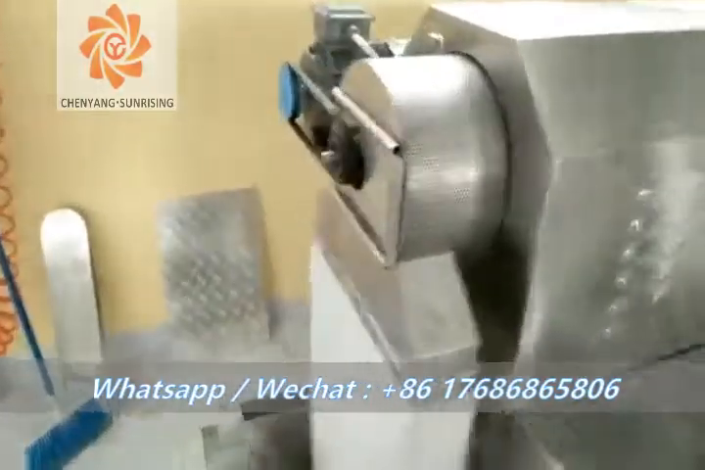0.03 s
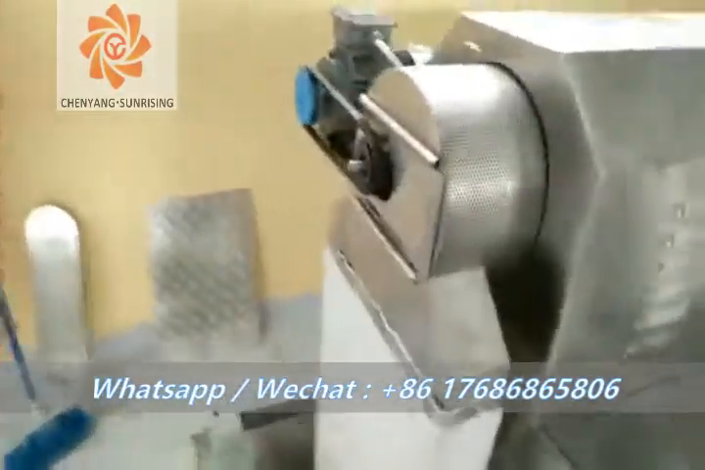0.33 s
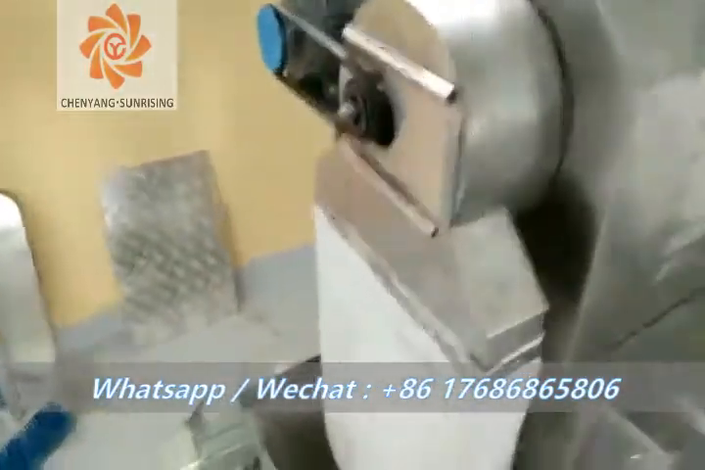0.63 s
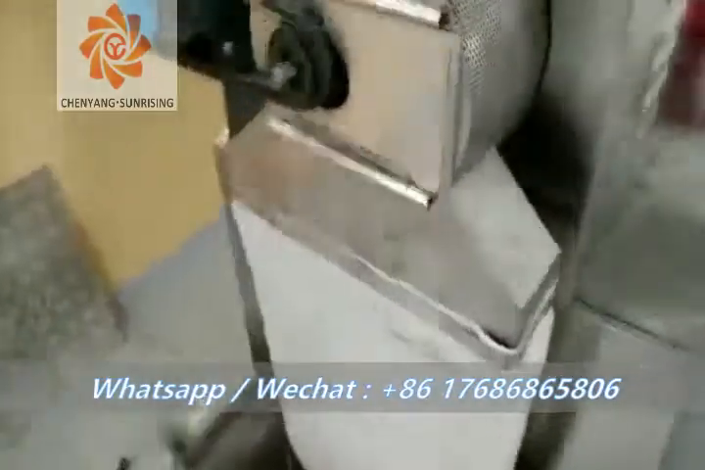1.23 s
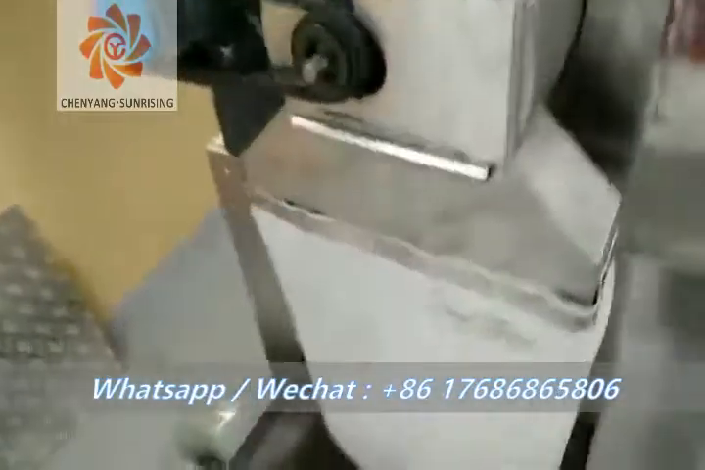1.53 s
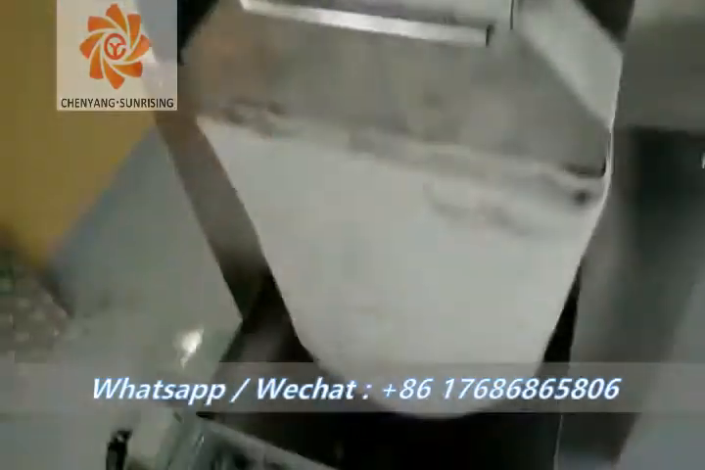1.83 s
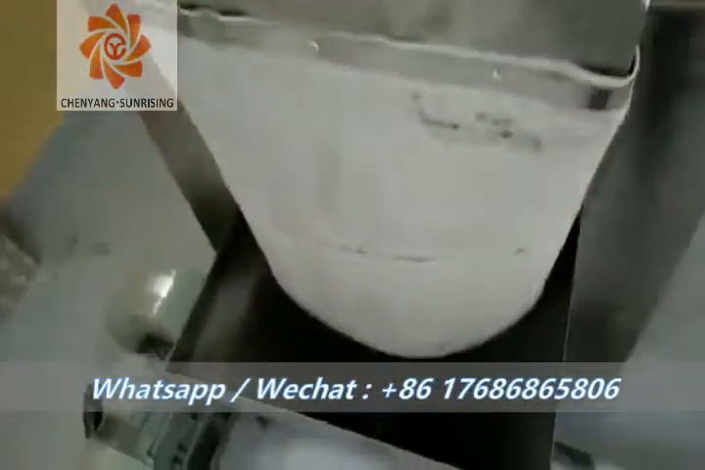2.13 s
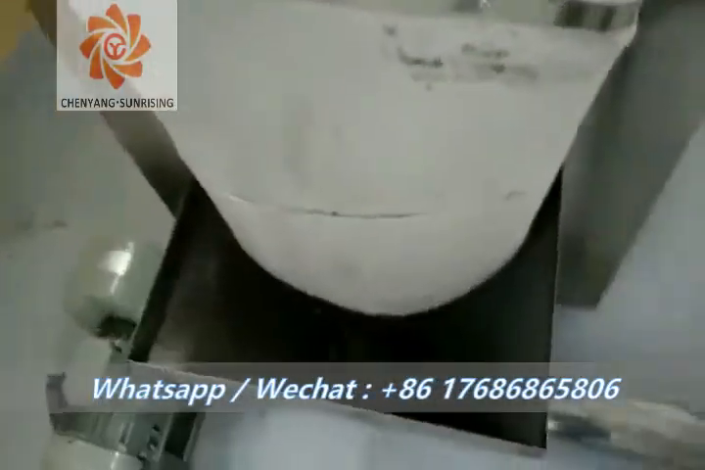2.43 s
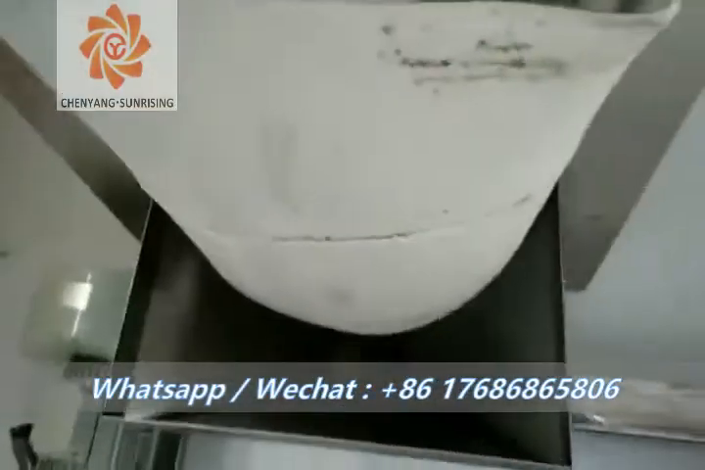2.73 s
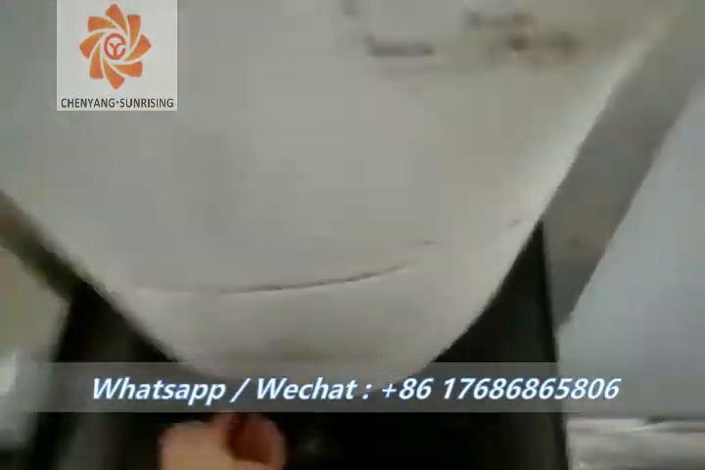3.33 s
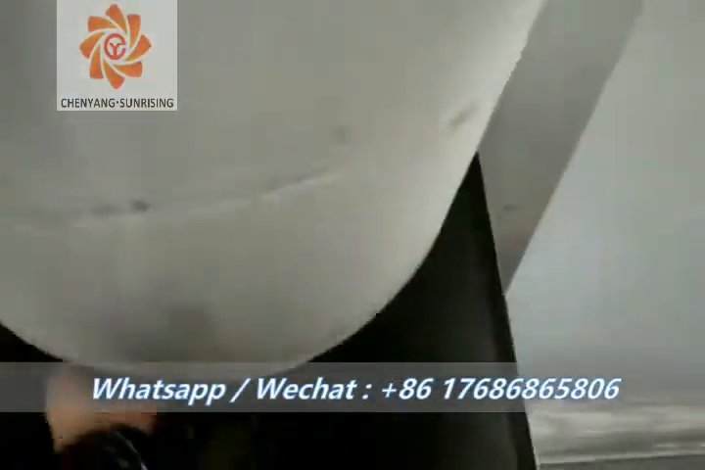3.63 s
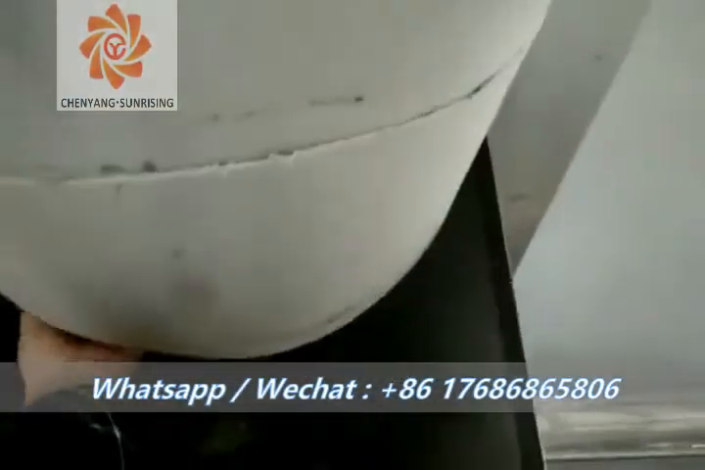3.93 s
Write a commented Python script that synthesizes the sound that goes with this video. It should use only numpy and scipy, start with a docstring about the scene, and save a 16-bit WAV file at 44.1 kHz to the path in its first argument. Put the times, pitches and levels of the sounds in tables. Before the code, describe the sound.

Steady roar and hum of an industrial food machine, with rushing blowers and a high whine.

```python
"""Food extruder in a factory.

The machine runs steadily while the microphone moves from its rotary cutter down to the outlet chute.
Motors and gears hum and throb, and the steel resonates in a low roar. Blowers rush, dough grinds on
steel, and a motor drive whines with sidebands over a thin, fluttering hiss. Level curves set the
balance along the way: the air is brightest at the cutter, the roar hollower at the chute."""
import sys
import numpy as np
from scipy import signal
from scipy.fft import rfft, irfft
from scipy.io import wavfile
from scipy.ndimage import uniform_filter1d

SR = 44100
rng = np.random.default_rng(int(sys.argv[2]) if len(sys.argv) > 2 else 0)


def log_audio(samples):
    """Write samples as a 16-bit WAV file to the path given in sys.argv[1]."""
    # one column per channel
    frames = np.atleast_2d(samples).T
    # limit to full scale, then quantise
    limited = np.clip(frames, -1, 1)
    pcm = np.round(limited * 32767).astype(np.int16)
    wavfile.write(sys.argv[1], SR, pcm)


N = 176400


def undb(db):
    """Amplitude ratio of a level in decibels."""
    return 10 ** (np.asarray(db) / 20)


def curve(rows):
    """Linear interpolation of (t/s, value) rows at every sample."""
    return np.interp(np.arange(N) / SR, *np.array(rows, float).T)


def walk(rate):
    """Low-passed Gaussian noise of unit variance, with about rate changes a second."""
    f = np.arange(N // 2 + 1) * SR / N
    y = irfft(rfft(rng.standard_normal(N)) * np.exp(-(f / rate) ** 2) * (f > 0), N)
    return y / y.std()


def noise(spectrum):
    """Spectral shaping: noise of rms 1, coloured by (f/Hz, level/dB) rows and falling off beyond them."""
    hz, db = np.array(spectrum, float).T
    f = np.maximum(np.arange(N // 2 + 1) * SR / N, 1)
    colour = undb(np.interp(np.log(f), np.log(np.sort(hz)), db))
    skirts = np.minimum(f / hz[0], 1) ** 2 * np.minimum(hz[-1] / f, 1) ** 4
    y = irfft(rfft(rng.standard_normal(N)) * colour * skirts, N)
    return y / y.std()


def flutter(depth_db, rate):
    """Random amplitude modulation: a wavering gain of mean power 1."""
    gain = undb(depth_db * walk(rate))
    return gain / np.sqrt(np.mean(gain ** 2))


def sine(hz):
    """A tone of rms 1 whose phase is the integral of its frequency."""
    return np.sqrt(2) * np.sin(2 * np.pi * (np.cumsum(hz) / SR + rng.random()))


def lowpass(x, hz):
    """An elliptic filter attenuates steeply above the cutoff."""
    return signal.sosfilt(signal.ellip(12, .1, 85, hz, fs=SR, output="sos"), x)


def dapple(x, depth_db, spot_hz=110, spot_s=.07):
    """Standing waves between steel panels, modelled as random gains on narrow bands; the rms is 1."""
    f, t, z = signal.stft(x, SR, nperseg=1024)
    field = rng.standard_normal(z.shape)
    for axis, span in enumerate([spot_hz / f[1], spot_s / t[1]]):
        field = uniform_filter1d(field, max(int(round(span)), 1), axis=axis)
    gain = undb(depth_db * field / field.std())
    gain = gain / np.sqrt(np.mean(abs(z) ** 2, axis=1) @ gain ** 2)  # even power from frame to frame
    y = signal.istft(z * gain, SR)[1][:N]
    return y / y.std()


def high_blip(at_s=2.935, width_s=0.013):
    """A Gaussian envelope shapes a brief, very faint blip of narrow-band noise near 10 kHz."""
    # blip spectrum (f/Hz, relative level/dB)
    band = [(9300, -30), (9900, 0), (10400, 2), (10750, -16), (11000, -30)]
    t = np.arange(N) / SR
    return noise(band) * undb(-57) * np.exp(-((t - at_s) / width_s) ** 2)


def flaring_band():
    """Amplitude modulation: a faint band of noise at 3-4 kHz flares briefly and irregularly."""
    # spectrum of the band (f/Hz, relative level/dB)
    band = [(2900, -6), (3250, 5), (3500, -5.5), (3900, -11.5), (4300, -36.5)]
    # its flares (t/s, level/dB)
    level = [(.2, -68), (.3, -49), (.38, -67), (1.12, -63), (1.22, -53), (1.4, -49), (1.53, -54),
             (1.63, -43.5), (1.8, -56.5), (3.2, -53), (3.8, -66), (3.95, -56)]
    return noise(band) * undb(curve(level))


def hiss(shaft_hz=53.4, pulse_depth=0.076):
    """Amplitude modulation: a thin hiss pulses at the rate of a fast shaft."""
    # hiss spectrum (f/Hz, relative level/dB)
    band = [(4800, -42.5), (5300, -13), (5680, -3), (5850, 3.5), (6030, 3), (6200, 0), (7000, 1), (7700, 4),
            (8800, 4.5), (9050, 9), (9400, 8.5), (9900, -5.5)]
    # hiss along the path (t/s, relative level/dB)
    level = [(0, -43.5), (1.2, -46), (1.6, -44), (2.5, -42), (3.53, -43), (3.8, -48.5), (4, -48)]
    pulse = 1 + pulse_depth * sine(shaft_hz + 0.24 * walk(2)) / np.sqrt(2)
    air = dapple(noise(band), depth_db=2.5)
    return air * undb(curve(level) + 0.15) * pulse * flutter(depth_db=1.0, rate=78)


def drive_whine(carrier_hz=5979, spacing_hz=48):
    """A carrier and evenly spaced sidebands fade independently inside a skirt of noise."""
    # partials, lowest sideband to highest (relative level/dB)
    partial_db = [-18, -0.5, -1, -1, -1, -5, -10.5]
    # rough skirt around the whine (f/Hz, relative level/dB)
    skirt = [(5600, -37), (5790, 3), (5950, 3), (6080, -4.5), (6200, -35.5)]
    # whine along the path (t/s, relative level/dB)
    level = [(0, -56), (.26, -49.5), (.4, -62), (.48, -52), (.67, -65), (.72, -49), (1.15, -48.5),
             (1.3, -52), (1.42, -46), (1.52, -60), (1.61, -49), (1.94, -54), (2.09, -45.5), (2.22, -59),
             (2.35, -49), (3.05, -49), (3.66, -52.5), (3.8, -59), (4, -61)]
    carrier = carrier_hz + 2.2 * walk(2.7)
    partials = sum(undb(db) * flutter(depth_db=4, rate=17) * sine(carrier + k * spacing_hz + walk(3.4))
                   for k, db in zip(range(-3, 4), partial_db))
    return (partials + undb(-2) * noise(skirt)) * undb(curve(level) - 5)


def grind(count=1500, low_hz=1256, high_hz=2988, decay_s=.007, scatter_db=2.5):
    """Impact excitation: each dough grain rings the steel as a damped sinusoid of its own pitch."""
    # grinding along the path (t/s, level/dB)
    level = [(.55, -48), (.72, -39.5), (1.7, -35), (2.8, -42.5), (3.4, -38), (3.7, -40.5)]
    t = np.arange(int(6 * decay_s * SR)) / SR
    envelope = np.exp(-t / decay_s) * (1 - np.exp(-t / 0.00068))
    ticks = np.zeros(N + len(t))
    for (when, pitch), size in zip(rng.random((count, 2)), rng.standard_normal(count)):
        hz = low_hz * (high_hz / low_hz) ** pitch
        i = int(when * N)
        ticks[i:i + len(t)] += undb(scatter_db * min(size, 2)) * envelope * np.sin(2 * np.pi * hz * t)
    return ticks[:N] / ticks.std() * undb(curve(level))


def motors(wander=0.0018):
    """Periodic forces of shafts, gears and blades radiate wavering tones whose levels vary with place."""
    # microphone at the cutter, over the chute and, after the sound ends, at its mouth (t/s)
    places = [0.8, 3.1, 6.8]
    # tones of the rotating parts (f/Hz)
    tones = [49.5, 160.5, 310, 383, 724, 885.5, 1096, 1461]
    # one row a tone (level/dB at the cutter, over the chute, at its mouth)
    levels = [(-47, -43, -35), (-44, -37, -44), (-45.5, -35, -41), (-40, -39, -47.5), (-47.5, -46.5, -46),
              (-42.5, -49, -66), (-51, -48.5, -51), (-51.5, -49.5, -54)]
    y = np.zeros(N)
    for hz, db in zip(tones, levels):
        gain = undb(curve(list(zip(places, db)))) * flutter(depth_db=3.5, rate=4.4)
        y += gain * sine(hz * (1 + wander * walk(4.5)))
    return y


def blowers():
    """Turbulence radiates broadband noise: a dull rush in the hall, brighter air at the cutter."""
    # spectra of rush, cutter air, jet and hall hiss (f/Hz, relative level/dB)
    rush_band = [(450, -12.5), (620, -3), (730, 3), (900, 1.5), (1050, 0), (1200, -6.5), (1600, -10),
                 (2100, -15), (2600, -29), (3500, -61)]
    air_band = [(900, -22.5), (1250, -4), (1600, 0.5), (1850, -2), (1980, 7.5), (2120, -3), (2400, -1),
                (2700, -13), (3200, -44.5)]
    jet_band = [(1800, -11), (2250, -2), (2500, -1), (2900, -0.5), (3150, -5.5), (3300, -10.5), (3420, -25),
                (3800, -21), (4300, -33), (5000, -38)]
    hall_band = [(2000, 7), (3300, 4.5), (4000, 0), (4700, -4.5), (5400, 0), (6000, -7.5)]
    # the same noises along the path (t/s, relative level/dB)
    rush_level = [(0, -27.5), (0.5, -27.5), (0.8, -27), (1.3, -29.5), (1.7, -31.5), (2.8, -29.5),
                  (3.4, -32.5), (4, -32.5)]
    air_level = [(0, -36), (.5, -42), (.72, -30), (1.2, -32.5), (1.7, -33), (2.3, -35.5), (2.9, -43),
                 (3.12, -33.5), (3.48, -36), (3.7, -40), (4, -47)]
    jet_level = [(0, -54), (.55, -53), (.7, -42), (1.1, -36.5), (1.8, -40), (2.2, -35.5), (2.6, -37.5),
                 (3.3, -40), (4, -36.5)]
    hall_level = [(0, -54), (1.7, -54), (2.4, -73), (3.5, -62), (4, -70)]
    rush = dapple(noise(rush_band), depth_db=3.0) * undb(curve(rush_level))
    air = dapple(noise(air_band), depth_db=5.0) * undb(curve(air_level) - 1)
    jet = dapple(noise(jet_band), depth_db=4.5) * undb(curve(jet_level) - 1.5)
    cutter_air = (air + jet) * flutter(depth_db=1.0, rate=54)
    hall = noise(hall_band) * undb(curve(hall_level))
    return rush + cutter_air + hall


def hums(throb_hz=126, gear_hz=196, blade_hz=539, panel_hz=2013, wander_hz=2.0):
    """Forced vibration: motor, gears, casing, blades and a panel hum, each swelling and sinking."""
    # pitch of the casing's drone (t/s, f/Hz)
    drone_pitch = [(0, 256), (1.6, 254.4), (1.85, 247.8), (4, 249.5)]
    # swells of each hum along the path (t/s, level/dB)
    throb = [(0, -38), (.1, -42), (.19, -23), (0.281, -45), (.35, -26.5), (.46, -40), (.57, -22.5),
             (.75, -40.5), (.98, -43), (1.13, -25.5), (1.21, -44), (1.321, -24.5), (1.42, -40),
             (1.65, -37.5), (1.78, -33.5), (2.35, -39), (2.9, -31), (3.1, -38)]
    gear = [(0, -45), (.15, -28.5), (.35, -46), (.52, -27.5), (.7, -39), (1.25, -33.5), (2.6, -27.5),
            (3.1, -32.5), (3.7, -26.5), (4, -28)]
    drone = [(0, -32), (.06, -19.5), (.23, -45), (.32, -30), (.5, -33), (.62, -39), (.72, -21), (.8, -44),
             (.96, -44), (1.07, -21.5), (1.15, -33), (1.42, -33), (1.55, -25), (1.65, -36), (1.8, -33),
             (1.92, -24), (2.08, -36), (2.28, -26), (2.44, -23.5), (2.62, -30.5), (2.74, -23.5),
             (3.02, -32.5), (3.13, -23), (3.33, -26.5), (3.48, -37), (3.68, -30.5)]
    blade = [(0, -45), (1.35, -48), (1.55, -38.5), (2.85, -34), (3.12, -41), (3.55, -34), (4, -28)]
    panel = [(.5, -50), (.75, -43), (1.4, -47), (2.1, -42.5), (2.85, -53), (3.2, -42), (3.6, -53)]
    voices = [(throb_hz, throb), (gear_hz, gear), (curve(drone_pitch), drone),
              (blade_hz, blade), (panel_hz, panel)]
    return sum(sine(hz + wander_hz * walk(4.8)) * flutter(depth_db=2.5, rate=12) * undb(curve(level))
               for hz, level in voices)


def machine_body():
    """Resonance: the frame booms, rumbles and roars, casing and housing ring, the chute sounds hollow."""
    # resonance bands of frame, steel casing, cutter housing and chute (f/Hz, relative level/dB)
    boom_band = [(22, -21), (33, -26.5), (42, -12), (50, 1.5), (60, -10), (80, -18), (120, -34.5)]
    rumble_band = [(40, -34), (55, -11.5), (70, -7.5), (90, -3.5), (130, -2.5), (165, 2.5), (200, -11.5),
                   (300, -39.5)]
    roar_band = [(130, -48), (175, -5), (200, 0.5), (222, -1), (255, -2), (310, -1.5), (400, -6),
                 (460, -12), (600, -36.5), (1000, -63)]
    casing_band = [(215, -28.5), (236, -5), (247, -2.5), (258, -0.5), (280, -4.5), (310, -5), (345, -36)]
    housing_band = [(270, -18.5), (320, 0), (380, 4.5), (425, -1.5), (450, -0.5), (500, -18.5)]
    chute_band = [(330, -30.5), (450, 2.5), (520, 9), (610, 2.5), (700, -3), (900, -22)]
    # the same resonances along the path (t/s, relative level/dB)
    boom_level = [(0, -50), (1.3, -40), (2.8, -41), (3.7, -30.5)]
    rumble_level = [(0, -33), (.19, -28.5), (.42, -27.5), (.56, -28), (.74, -35), (.95, -31.5), (1.3, -28),
                    (1.62, -31), (1.8, -27.5), (3.35, -31.5), (4, -26)]
    roar_level = [(0, -26.5), (.5, -26), (.9, -27.5), (1.3, -25), (2.2, -24), (3, -24), (3.5, -22.5),
                  (4, -21)]
    casing_level = [(0, -25.5), (.45, -28.5), (.92, -33), (1.3, -26), (1.66, -34), (1.9, -28.5)]
    housing_level = [(.55, -39.5), (.8, -23.5), (.98, -24.5), (1.12, -32), (1.3, -22.5), (1.42, -29),
                     (1.8, -24.5), (2.4, -31), (3, -25.5)]
    chute_level = [(0.5, -28.5), (1.1, -40.5), (1.55, -26.5), (2.5, -31), (3.2, -28), (3.65, -20),
                   (4, -20.5)]
    boom = noise(boom_band) * undb(curve(boom_level) - 8)
    rumble = noise(rumble_band) * undb(curve(rumble_level) - 0.5) * flutter(depth_db=1.5, rate=13)
    roar = noise(roar_band) * undb(curve(roar_level) - 0.5)
    casing = noise(casing_band) * undb(curve(casing_level))
    housing = noise(housing_band) * undb(curve(housing_level))
    chute = noise(chute_band) * undb(curve(chute_level) - 4)
    return boom + rumble + roar + casing + housing + chute


def scene():
    """Superposition of all sources at one point; only the faint blip reaches above the hiss."""
    mix = (motors() + hums() + drive_whine() + machine_body()
           + blowers() + flaring_band() + grind() + hiss())
    return (lowpass(mix, hz=9750) + high_blip())[None]


def record(dry):
    """Band limiting: a steep low-pass removes the highest treble."""
    return lowpass(dry, hz=10800)


dry = scene()
out = record(dry)
log_audio(out)
```